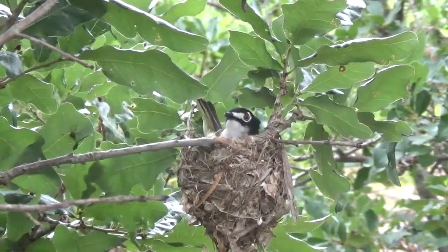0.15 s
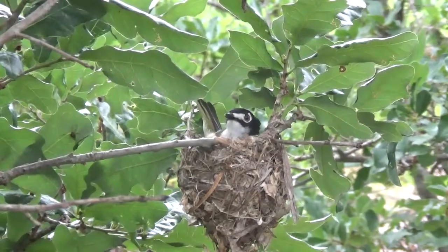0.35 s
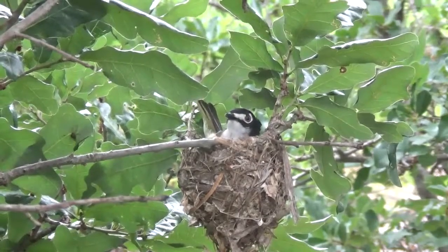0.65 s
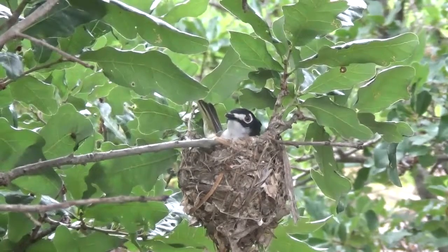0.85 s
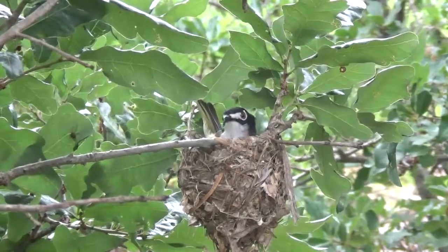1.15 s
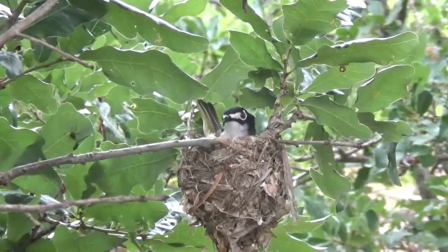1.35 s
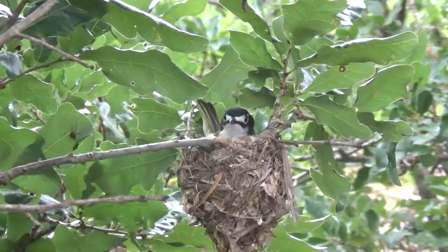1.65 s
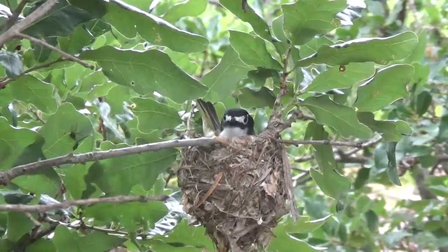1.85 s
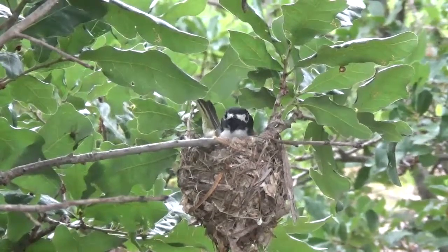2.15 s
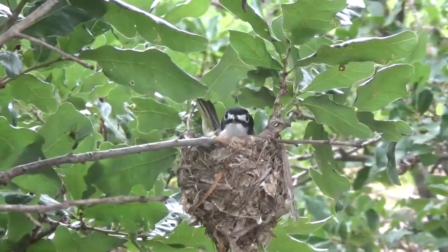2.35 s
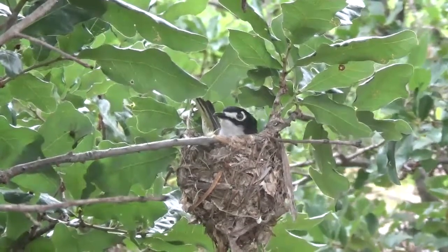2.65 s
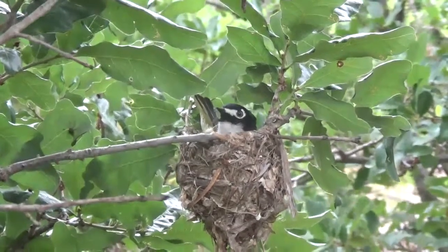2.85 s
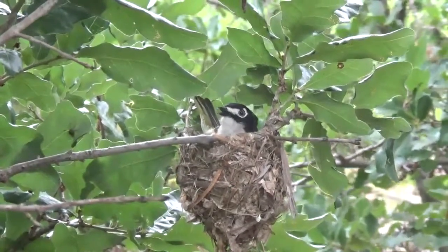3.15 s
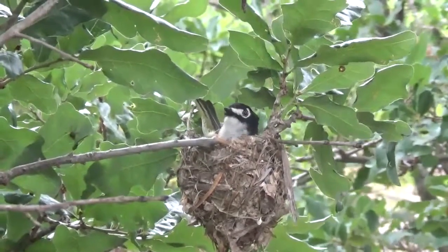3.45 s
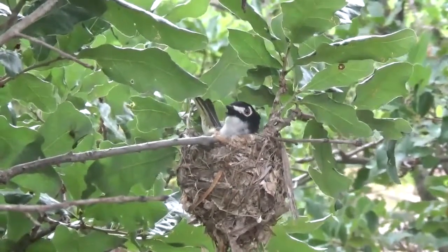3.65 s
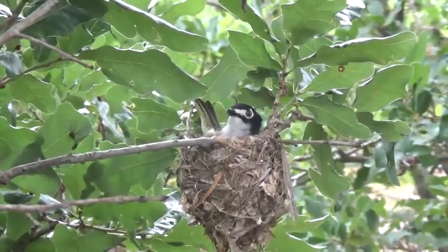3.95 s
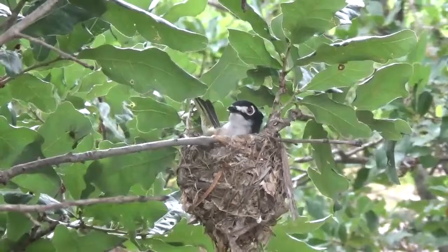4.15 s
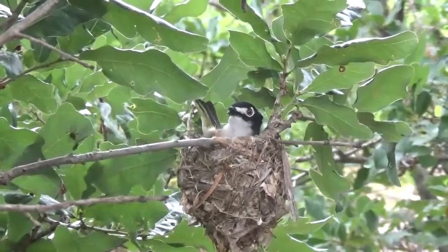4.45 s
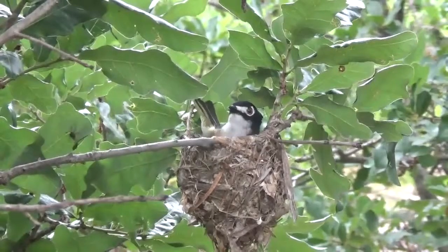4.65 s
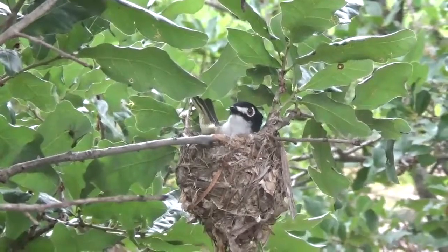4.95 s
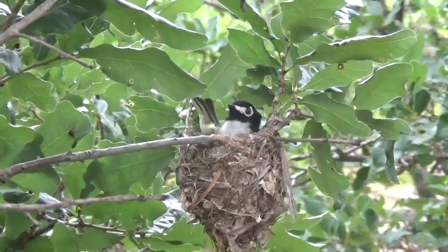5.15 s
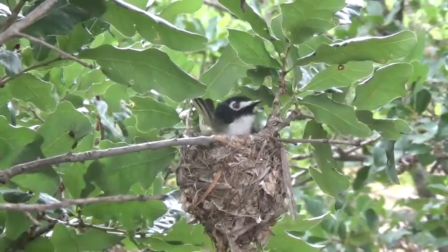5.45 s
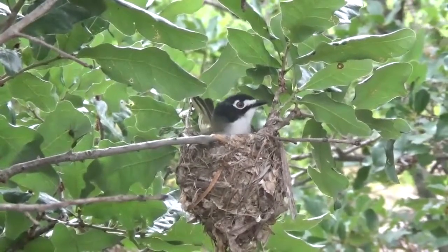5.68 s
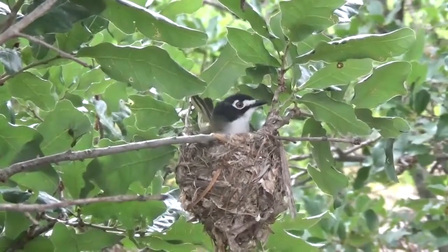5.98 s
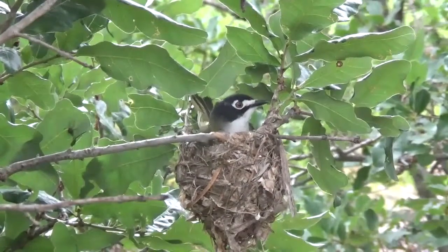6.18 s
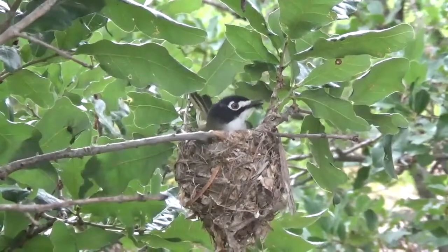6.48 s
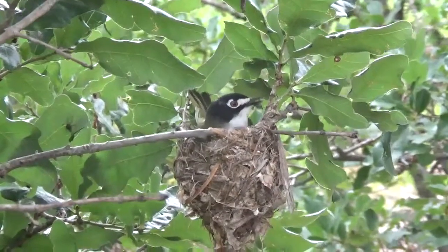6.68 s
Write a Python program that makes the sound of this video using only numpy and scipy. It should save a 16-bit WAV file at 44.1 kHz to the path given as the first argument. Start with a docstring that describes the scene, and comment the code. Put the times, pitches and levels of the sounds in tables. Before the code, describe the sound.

Quiet woodland air, then a close bird's jumbled song of tiny sharp chips, nasal mews, trills and buzzes, with another bird faintly whistling far off.

```python
"""Vireo singing in an oak wood

A near vireo strings together whistles, chatter, nasal notes and buzzes, each a quick gesture of the syrinx.
One side alone gives a harmonic tone; two sides together beat, which puts sidebands on every partial.
Branches and leaves scatter the song as echoes and noise tails; a second bird whistles glides far off.
Shaped noise makes the rumble and hiss of the wood and a low, distant drone."""
import sys
import numpy as np
from scipy import signal
from scipy.fft import rfft, irfft
from scipy.io import wavfile
from scipy.ndimage import uniform_filter1d

SR = 44100
rng = np.random.default_rng(int(sys.argv[2]) if len(sys.argv) > 2 else 0)


def master(y):
    """Save y as 16-bit WAV."""
    cut = np.clip(np.atleast_2d(y).T, -1, 1)
    pcm = np.round(cut * 32767)  # scale
    wavfile.write(sys.argv[1], SR, pcm.astype(np.int16))


N = 300762  # samples


def amp(db):
    """Decibels to gain."""
    return 10 ** (np.asarray(db) / 20)


def unit(x):
    """Scales to rms 1."""
    return x / np.sqrt(np.mean(x ** 2) + 1e-20)


def read(points, hz):
    """Reads a table on a log-frequency axis."""
    f, value = np.transpose(points)
    return np.interp(np.log(hz + 1), np.log(f + 1), value)


def add(mix, start_s, sound):
    """Mixes a sound in at its start time."""
    part = mix[max(round(start_s * SR), 0):][:len(sound)]
    part += sound[:len(part)]


def wander(size, rate_hz):
    """Random motion of rms about 1, fading out smoothly above the given rate."""
    hz = np.fft.rfftfreq(size + 4096, 1 / SR)
    spectrum = rfft(rng.standard_normal(2 * len(hz) - 2))
    return unit(irfft(spectrum * np.exp(-(hz / rate_hz) ** 2)))[:size]


def vireo():
    """The near bird's whole song: every kind of syrinx gesture, dry at the beak."""
    one_side = whistles() + chatter() + yelps() + slurs() + mew() + grace_notes() + rasp_trail()
    both_sides = squeak() + snarl() + chips() + twang() + buzzes() + sneeze()
    return one_side + both_sides


def whistles():
    """Clear tones from one side of the syrinx, the fundamental far above its overtones."""
    # throat colour: level_db of harmonics 1, 2, .. before the windpipe
    harmonics_db = [0, -27.5, -35.5, -31]
    # plain glides: start_s, length_s, first_hz, middle_hz, last_hz, level_db
    plain = [(2.024, 0.01, 3400, 3810, 4220, -27), (4.479, 0.041, 3130, 2690, 2460, -27.5),
             (4.507, .021, 5200, 4900, 5900, -36), (6.370, .044, 6550, 5760, 5100, -44),
             (6.395, 0.012, 10900, 10760, 10100, -29)]
    # a climb that cracks downward: time_s, pitch_hz, level_db
    whip = [(2.797, 3416, -45), (2.807, 5800, -36), (2.814, 7270, -46), (2.818, 6740, -26),
            (2.82, 4840, -13), (2.823, 3800, -35)]
    # the downstroke that tops the trill: time_s, pitch_hz, level_db
    flick = [(5.42, 6630, -45), (5.423, 5410, -18.5), (5.426, 4740, -6.5), (5.429, 4350, -14),
             (5.433, 4540, -18)]
    # a note with fast, even vibrato: time_s, centre_pitch_hz, level_db
    warble = [(4.524, 2490, -39), (4.530, 3400, -23), (4.537, 3525, -10), (4.544, 3440, -22.5),
              (4.551, 3120, -17), (4.558, 2765, -23.5), (4.570, 2390, -27.5), (4.586, 2050, -51)]
    notes = arches() + hooks() + trill() + dips() + glides(plain, swell_db=16.5)
    notes += [whip, flick, vibrato(warble, rate_hz=88, depth=0.12, crest_s=.0007)]
    return one_sided(notes, harmonics_db, jitter=.007, rush_db=-31.5, gain_db=0)


def arches():
    """Gestures whose pitch arches up and slides down."""
    # share of the note's length, pitch_hz, level_db; pitch and level before each note's changes
    shape = [(0, 2226, -39.5), (.14, 3090, -17), (.32, 3897, -22.5), (.43, 6280, -55), (.51, 4580, -27.5),
             (.57, 3415, -12), (.69, 2660, -17.5), (.82, 2290, -23.5), (1, 2095, -50)]
    # start_s, length_s, transposition_semitones, gain_db, crescendo_db
    notes = [(3.452, 0.064, 0.137, -2.5, 5.5), (3.534, 0.064, -0.064, 0, -3),
             (3.636, 0.057, 0.071, -1.5, 0)]
    return repeats(shape, notes)


def hooks():
    """High gestures ending in a loud downstroke."""
    # share of the note's length, pitch_hz, level_db; pitch and level before each note's changes
    shape = [(0, 5700, -25), (.22, 6550, -29.5), (.44, 7300, -26.5), (.63, 7060, -23.5), (.77, 5500, -7.5),
             (.91, 4660, -10.5), (1, 4400, -40)]
    # start_s, length_s, transposition_semitones, gain_db, crescendo_db
    notes = [(4.719, .032, -0.074, -1, 2.5), (4.776, .035, 0.1, 1, -2.5), (4.840, .0355, -0.1, -0.5, 0.5)]
    return repeats(shape, notes)


def trill():
    """One short gesture transposed upward step by step."""
    # share of the note's length, pitch_hz, level_db; pitch and level before each note's changes
    shape = [(0, 3200, -35), (.25, 3640, -19), (.55, 3605, -13), (.78, 3120, -15.5), (1, 2820, -34.5)]
    # start_s, length_s, transposition_semitones, gain_db, crescendo_db
    notes = [(5.331, .013, -4.5, -4.5, 0), (5.3487, 0.014, -3, -4, 9.5), (5.366, .014, -0.2, -1, 2),
             (5.3838, .0135, 3.5, 4.5, -5), (5.399, 0.016, 5, 5, -1)]
    return repeats(shape, notes)


def dips():
    """Gestures that plunge in pitch and turn up softly."""
    # share of the note's length, pitch_hz, level_db; pitch and level before each note's changes
    shape = [(0, 4000, -32), (.1, 3770, -19.5), (.22, 3160, -10.5), (.33, 2560, -20.5), (.42, 1930, -32),
             (.55, 1803, -43.5), (.72, 2220, -26.5), (.87, 2630, -33), (1, 2680, -43)]
    # start_s, length_s, transposition_semitones, gain_db, crescendo_db
    notes = [(5.464, .055, 0.1, 0, -1.5), (5.5412, .051, -0.1, 0, 0.5)]
    return repeats(shape, notes)


def chatter():
    """Sharp upstrokes from one side, with an unsteady pitch."""
    # throat colour: level_db of harmonics 1, 2 before the windpipe
    harmonics_db = [0.5, -27]
    # share of the note's length, pitch_hz, level_db; pitch and level before each note's changes
    shape = [(0, 3030, -45.5), (.16, 3670, -30.5), (.27, 4620, -12), (.38, 5200, -9), (.44, 6560, -36),
             (.57, 7530, -30.5), (.78, 6300, -33.5), (.95, 5150, -22)]
    # start_s, length_s, transposition_semitones, gain_db, crescendo_db
    notes = [(3.183, 0.035, -0.3, -4.5, 1.5), (3.2488, 0.034, 0.25, 0, 2), (3.319, .034, -0.24, .5, -1)]
    return one_sided(repeats(shape, notes), harmonics_db, jitter=0.023, rush_db=-23, gain_db=0)


def yelps():
    """One-sided notes whose throat favours the second harmonic; a short yelp closes each upstroke."""
    # throat colour: level_db of harmonics 1, 2, .. before the windpipe
    harmonics_db = [-14, 2, -16, -28, -35]
    # share of the note's length, pitch_hz, level_db; pitch and level before each note's changes
    shape = [(0, 1634, -36), (.33, 2106, -20), (.58, 2340, -15.5), (1, 2340, -39)]
    # start_s, length_s, transposition_semitones, gain_db, crescendo_db
    closers = [(3.213, .0135, -0.1, -0.5, 0), (3.280, 0.012, 0.25, 0.5, -1), (3.350, 0.0117, -0.4, -6, 2)]
    # the squawk that the whip breaks into: time_s, pitch_hz, level_db before the layer gain
    squawk = [(2.82, 4240, -31), (2.823, 3500, -26.5), (2.826, 2830, -16.5), (2.83, 2360, -17.5),
              (2.834, 2008, -34), (2.838, 2280, -18.5), (2.842, 2760, -16.5), (2.847, 2786, -30),
              (2.854, 2720, -30)]
    # a note with fast, even vibrato: time_s, centre_pitch_hz, level_db before the layer gain
    quaver = [(4.257, 3010, -28), (4.267, 2990, -23.5), (4.275, 2833, -19.5), (4.284, 2753, -27),
              (4.289, 2720, -36)]
    notes = repeats(shape, closers) + [squawk, vibrato(quaver, rate_hz=122, depth=.1, crest_s=.006)]
    return one_sided(notes, harmonics_db, jitter=.008, rush_db=-26.5, gain_db=-0.5)


def slurs():
    """Nasal falling notes from one side; the second harmonic leads."""
    # throat colour: level_db of harmonics 1, 2, .. before the windpipe
    harmonics_db = [-6, 0, -22, -35, -29, -28]
    # share of the note's length, pitch_hz, level_db; pitch and level before each note's changes
    shape = [(0, 1680, -46), (.08, 1720, -27), (.31, 1652, -27.5), (.58, 1493, -29.5), (.8, 1295, -33.5),
             (1, 1034, -43)]
    # start_s, length_s, transposition_semitones, gain_db, crescendo_db
    notes = [(6.678, .047, 0.11, -0.5, 4), (6.751, 0.052, -0.12, 0.5, -1.5)]
    return one_sided(repeats(shape, notes), harmonics_db, jitter=0.0037, rush_db=-32, gain_db=-1)


def mew():
    """A nasal, falling note from one side; the third harmonic leads."""
    # throat colour: level_db of harmonics 1, 2, .. before the windpipe
    harmonics_db = [-15, -10.5, 0, -14, -23, -27, -28]
    # time_s, pitch_hz, level_db before the layer gain
    note = [(3.033, 1896, -37), (3.04, 1760, -40), (3.047, 1670, -25), (3.058, 1520, -25),
            (3.07, 1430, -23.5), (3.078, 1416, -28), (3.082, 1194, -31), (3.09, 967, -33)]
    return one_sided([note], harmonics_db, jitter=.004, rush_db=-36, gain_db=-0.5)


def grace_notes():
    """Soft one-sided glides with an unsteady pitch and audible breath."""
    # throat colour: level_db of harmonics 1, 2, .. before the windpipe
    harmonics_db = [-2, 1.5, -11.5, -27]
    # start_s, length_s, first_hz, middle_hz, last_hz, level_db before the layer gain
    notes = [(2.030, .012, 2580, 2970, 3120, -34.5), (4.474, 0.02, 1520, 1828, 1830, -32.5),
             (5.319, 0.014, 1500, 1780, 2530, -30.5)]
    return one_sided(glides(notes, swell_db=12), harmonics_db, jitter=0.023, rush_db=-21, gain_db=-3)


def rasp_trail():
    """A hoarse trail over and after the mew: strong pitch jitter breaks up its tone."""
    # start_s, length_s, first_hz, middle_hz, last_hz, level_db before the layer gain
    notes = [(3.075, .068, 3350, 3150, 3400, -41.5)]
    return one_sided(glides(notes, swell_db=5.5), [0, -17], jitter=0.21, rush_db=-26.5, gain_db=2.5)


def squeak():
    """A brief two-sided note with a rough beat; the second side joins at once."""
    # throat colour: level_db of harmonics 1, 2, .. before the windpipe; first side, second side
    harmonics_db = ([-23.5, 0.5, -17], [-53, -60, -29, -30, -46])
    # time_s, pitch_hz, level_db before the layer gain, second_side_hz
    note = [(0.0, 3020, -14, 1990), (0.012, 2960, -16.5, 1990), (0.022, 2928, -20.5, 1994),
            (0.033, 2880, -13.5, 1996), (0.038, 2915, -41, 1980), (0.046, 2630, -22, 1920)]
    return two_sided([note], harmonics_db, jitter=0.0064, coupling=0.17, rasp=0.28, lag_s=0.0018,
                     closed_db=-2, rush_db=-26.0, gain_db=-2)


def snarl():
    """A long, breathy two-sided note, its top damped while the beak is narrow."""
    # throat colour: level_db of harmonics 1, 2, .. before the windpipe; first side, second side
    harmonics_db = ([-13.5, -15, -2.5, -1.5, 2.5, 4.5], [-17.5, -10, 3.5, -24])
    # time_s, pitch_hz, level_db before the layer gain, second_side_hz
    note = [(1.735, 1585, -42, 2463), (1.745, 1554, -32, 2610), (1.762, 1683, -29.5, 2843),
            (1.777, 1622, -29, 2742), (1.795, 1520, -31, 2513), (1.815, 1447, -31.5, 2372),
            (1.833, 1416, -31.5, 2150.0), (1.847, 1340.0, -38, 2080)]
    return two_sided([note], harmonics_db, jitter=0.0091, coupling=0.12, rasp=0.13, lag_s=0.0099,
                     closed_db=-36, rush_db=-7, gain_db=-1.0)


def chips():
    """Rising notes with a strong beat between the two sides."""
    # throat colour: level_db of harmonics 1, 2, .. before the windpipe; first side, second side
    harmonics_db = ([-14.5, 1, -19, -34], [-27, -9.5, -38])
    # share of the note's length, pitch_hz, level_db, second_side_hz; before each note's changes
    shape = [(0, 1483, -38, 2240), (.17, 2020, -28.5, 2547), (.3, 2341, -16, 2950), (.42, 2748, -17, 3365),
             (.6, 3140, -25, 3710), (.77, 3130, -20.5, 3730), (1, 2900, -35, 3682)]
    # start_s, length_s, transposition_semitones, gain_db, crescendo_db
    notes = [(2.071, .035, -0.1, -1, 1.5), (2.128, 0.04, 0.11, 1, 4.5), (2.192, .041, -0.094, -1, -2)]
    return two_sided(repeats(shape, notes), harmonics_db, jitter=.012, coupling=0.26, rasp=0.092,
                     lag_s=.002, closed_db=-4, rush_db=-19.5, gain_db=0.5)


def twang():
    """A breathy two-sided note whose two pitches rise and fall together."""
    # throat colour: level_db of harmonics 1, 2, .. before the windpipe; first side, second side
    harmonics_db = ([-8, 0, 6, -1.5], [-15, 0, -18])
    # time_s, pitch_hz, level_db before the layer gain, second_side_hz
    note = [(4.195, 1754, -47, 2666), (4.203, 2164, -33, 2917), (4.211, 2364, -27.5, 3170),
            (4.219, 2400, -29, 3120), (4.228, 2225, -28, 2920), (4.238, 1800, -47, 2610)]
    return two_sided([note], harmonics_db, jitter=0.0077, coupling=0.19, rasp=.08, lag_s=0.0045,
                     closed_db=-8.5, rush_db=-7, gain_db=-0.5)


def buzzes():
    """Long two-sided notes with the strongest beat, heard as a buzz."""
    # throat colour: level_db of harmonics 1, 2, .. before the windpipe; first side, second side
    harmonics_db = ([-20, 1, -13, -30.5], [-29, -24, -7, -10.5, -19.5, -33])
    # share of the note's length, pitch_hz, level_db, second_side_hz; before each note's changes
    shape = [(0, 2400, -32.5, 1776), (.08, 2530, -14.5, 1797), (.25, 2639, -19, 1765),
             (.33, 2614, -13.5, 1661), (.43, 2720, -14, 1594), (.56, 2810, -17.5, 1690),
             (.8, 2820, -20.5, 1770), (1, 2790, -34.5, 1800)]
    # start_s, length_s, transposition_semitones, gain_db, crescendo_db
    notes = [(5.092, .064, 0.1, -0.5, 7), (5.174, .068, -0.13, 0, -3.5)]
    return two_sided(repeats(shape, notes), harmonics_db, jitter=.006, coupling=0.28, rasp=.1,
                     lag_s=0.015, closed_db=-5, rush_db=-21.5, gain_db=0)


def sneeze():
    """A breathy, raspy two-sided note with the two pitches close together."""
    # throat colour: level_db of harmonics 1, 2, .. before the windpipe; first side, second side
    harmonics_db = ([-7.5, 0, 7.5, 2, -1], [-22, -1.5, 6, 2])
    # time_s, pitch_hz, level_db before the layer gain, second_side_hz
    note = [(6.336, 2185, -45, 2115), (6.343, 2108, -35.5, 2095), (6.35, 2160, -33, 2270),
            (6.355, 2690, -28.5, 2693), (6.36, 3030, -28.5, 3180), (6.367, 2980, -36, 3280),
            (6.378, 3130.0, -55, 3200.0)]
    return two_sided([note], harmonics_db, jitter=0.012, coupling=0.14, rasp=0.25, lag_s=0.01,
                     closed_db=-3, rush_db=-5, gain_db=-2)


def repeats(shape, notes):
    """Sings one learnt shape repeatedly, each time stretched, transposed and leaning on its start or end."""
    share, hz, db, *second_hz = np.transpose(shape)
    sung = []
    for start, length, semitones, gain_db, crescendo_db in notes:
        ratio = 2 ** (semitones / 12)
        level = db + gain_db + crescendo_db * (share - .5)
        second_side = [side * ratio for side in second_hz]
        sung.append(np.column_stack([start + length * share, hz * ratio, level, *second_side]))
    return sung


def glides(notes, swell_db):
    """The pitch bends smoothly from first to last; the level swells towards the middle and dies away."""
    u = np.linspace(-1, 1, 21)  # start to end of the note
    sung = []
    for start, length, first, middle, last, db in notes:
        time = start + length * (u + 1) / 2
        pitch = middle + (last - first) / 2 * u + ((first + last) / 2 - middle) * u ** 2
        sung.append(np.column_stack([time, pitch, db - swell_db * u ** 2]))
    return sung


def vibrato(note, rate_hz, depth, crest_s):
    """Swings the pitch about its centre; the first crest comes crest_s after the note starts."""
    s, hz, db = np.transpose(note)
    t = np.arange(s.min(), s.max(), 1 / SR)
    swing = 1 + depth * np.cos(2 * np.pi * rate_hz * (t - t[0] - crest_s))
    return np.column_stack([t, np.interp(t, s, hz) * swing, np.interp(t, s, db)])


def one_sided(notes, harmonics_db, jitter, rush_db, gain_db):
    """One vibrating side of the syrinx gives a harmonic tone, with breath around it."""
    out = np.zeros(N)
    for rows in notes:
        start, (hz, db) = gesture(rows)
        _, tone = membrane(hz, harmonics_db, jitter)
        sound = amp(db) * tone.imag + breathy(hz, db, rush_db)
        add(out, start, amp(gain_db) * fade(len(hz)) * sound)
    return out


def two_sided(notes, harmonics_db, jitter, coupling, rasp, lag_s, closed_db, rush_db, gain_db):
    """Both sides share one air stream, so their beat puts sidebands on every partial."""
    out = np.zeros(N)
    for rows in notes:
        start, (hz, db, second_hz) = gesture(rows)
        size = len(hz)
        phase, tone = membrane(hz, harmonics_db[0], jitter)
        second_phase, second_tone = membrane(second_hz, harmonics_db[1], jitter)
        joined = np.minimum(np.arange(size) / SR / lag_s, 1) ** 2  # entry of the second side
        beat = coupling * np.cos(phase - second_phase) + rasp * wander(size, rate_hz=1400)
        flow = np.exp(joined * beat * (.6 + 1j))  # the beat swells the tone and pulls its phase
        flow = flow / np.sqrt(np.mean(np.abs(flow) ** 2))
        voice = (flow * (tone + joined * second_tone)).imag
        sound = voice + joined * amp(rush_db) * rush(size)
        add(out, start, amp(db + gain_db) * fade(size) * beak(sound, closed_db))
    return out


def gesture(rows):
    """Start time and per-sample controls of a note; muscle inertia rounds the corners."""
    s, *columns = np.transpose(rows)
    t = np.arange(s.min(), s.max(), 1 / SR)
    controls = [uniform_filter1d(np.interp(t, s, c), size=80, mode="nearest") for c in columns]
    return s.min(), controls


def fade(size):
    """The membranes start and stop within about a millisecond."""
    edge_s = np.minimum(np.arange(size), np.arange(size)[::-1]) / SR
    return np.sin(np.pi / 2 * np.minimum(edge_s / .0012, 1)) ** 2


def membrane(hz, harmonics_db, jitter):
    """One side of the syrinx through the windpipe: its phase and complex tone, with an unsteady pitch."""
    # colour of windpipe and beak: frequency_hz, level_db before it is set against the leading harmonic
    windpipe = [(1000, -26), (1300, -10), (1650, -5), (2100, -5.5), (3100, 2.5), (5000, 4), (6200, -1),
                (7600, -2.5), (9700, 0.5), (11000, -2)]
    unsteady_hz = hz * (1 + jitter * wander(len(hz), rate_hz=580))
    phase = 2 * np.pi * np.cumsum(unsteady_hz) / SR
    k = np.arange(1, len(harmonics_db) + 1)[:, None]
    pipe_db = read(windpipe, k * hz)
    leader = np.argmin(np.abs(harmonics_db))  # the harmonic nearest 0 dB
    pipe_db = pipe_db - pipe_db[leader]
    level = amp(np.array(harmonics_db)[:, None] + pipe_db)
    partials = level * np.exp(1j * k * phase) * (k * hz < SR / 2)
    return phase, partials.sum(0)


def breathy(hz, db, rush_db):
    """Air keeps rushing through the brief dips of the tone."""
    return amp(rush_db) * uniform_filter1d(amp(db), size=700, mode="nearest") * rush(len(hz))


def rush(size):
    """Turbulent air through the open beak: coloured noise."""
    # colour of the rushing air before it is scaled to rms 1: frequency_hz, level_db
    air_colour = [(1000, -45), (1900, -20.5), (2800, -12.5), (4500, 1), (6500, 2.5), (7800, 1), (9700, 3),
                  (12000, -9.5), (16000, -24)]
    hz = np.fft.rfftfreq(2 * size, 1 / SR)
    return unit(irfft(rfft(rng.standard_normal(2 * size)) * amp(read(air_colour, hz))))[:size]


def beak(sound, closed_db):
    """The beak opens and shuts over a note; the top of the voice comes out best when it is wide."""
    low = signal.sosfiltfilt(signal.butter(4, 7000, fs=SR, output="sos"), sound)
    gape = np.sin(np.linspace(0, np.pi, len(sound)))
    return low + (sound - low) * amp(closed_db * (1 - gape) ** 2)


def ports(x):
    """The two microphone ports hear the bird with slightly different colour."""
    # port colour: frequency_hz, left_minus_right_db
    balance = [(2000, 0.5), (3200, -1.7), (4500, 0.5), (6000, 0.9), (10000, 0.5)]
    side_db = read(balance, np.fft.rfftfreq(N, 1 / SR)) / 2
    return irfft(rfft(x) * amp([side_db, -side_db]), N)


def branches(x):
    """Nearby branches and ground throw back a few distinct early echoes."""
    # reflections: delay_s, level_db
    echoes = [(.0027, -28), (.0042, -22.5), (.0063, -18), (.0084, -26.5), (0.0116, -28), (0.02, -27),
              (0.031, -29.5)]
    out = np.zeros(N)
    for delay_s, db in echoes:
        add(out, delay_s, amp(db) * x)
    return out


def foliage(x, t60_factor, spread):
    """Many faint reflections from leaves, dying band by band; spread is their left-right difference."""
    # decay of the leaf tail before t60_factor: frequency_hz, t60_s
    leaf_t60 = [(1500, 0.11), (3000, 0.2), (6000, 0.26), (11000, 0.33)]
    size = SR // 2
    sparse = rng.random(size) < .2
    taps = rng.standard_normal((2, size)) * sparse * (np.arange(size) > .003 * SR)
    hz, t, z = signal.stft(taps, SR, nperseg=128)
    decay_db = -60 * t / (t60_factor * read(leaf_t60, hz)[:, None])
    mid, side = signal.istft(z * amp(decay_db), SR, nperseg=128)[1]
    tail = np.array([mid + spread * side, mid - spread * side]) / np.linalg.norm(mid)
    return signal.fftconvolve(x[None], tail, axes=1)[:, :N]


def far_bird():
    """A second bird far off: plain one-sided glides of a single harmonic."""
    # start_s, length_s, first_hz, middle_hz, last_hz, level_db before the layer gain
    notes = [(2.34, .14, 4750, 3800, 2750, -58.5), (2.59, .13, 2580, 2320, 1910, -68),
             (2.89, .11, 4630, 3790, 3100, -62), (3.405, .04, 2880, 3190, 3280, -57.5)]
    return one_sided(glides(notes, swell_db=7), [0], jitter=.006, rush_db=-40.5, gain_db=-3)


def woodland_air(level_db=-56.0, patchy_db=0.85):
    """Distant rumble and leaf hiss: partly shared stereo noise, drifting a little in patches."""
    # colour of the air before it is scaled to rms 1: frequency_hz, level_db
    air = [(15, -34), (28, -11), (50, -3), (85, -4.5), (125, -4), (165, -9), (350, -10), (620, -11),
           (900, -11), (1200, -15.5), (1850, -18), (4500, -20), (6400, -22.5), (9000, -20.5),
           (11000, -27.5), (14000, -59.5)]
    # frequency_hz, left_right_likeness (1 is identical)
    likeness = [(60, 0.99), (130, 0.97), (260, 0.65), (560, 0.61), (1170, 0.37), (2450, 0.41), (5140, 0.68),
                (10800, 0.5)]
    hz = np.fft.rfftfreq(2048, 1 / SR)
    a, b, c, d, patches = rng.standard_normal((N // 512 + 5, len(hz), 5)).T
    patches = uniform_filter1d(patches, size=16, axis=0)  # across frequency
    patches = unit(uniform_filter1d(patches, size=12, axis=1))  # across time
    same = np.clip(read(likeness, hz), -1, 1)[:, None]
    left = a + 1j * b
    right = same * left + np.sqrt(1 - same ** 2) * (c + 1j * d)
    z = np.array([left, right]) * amp(read(air, hz)[:, None] + patchy_db * patches)
    noise = unit(signal.istft(z, nperseg=2048, noverlap=1536)[1][:, :N])
    return noise * amp(level_db)


def drone(centre_hz=92, width_hz=14, level_db=-65):
    """A low, far-off drone of narrow-band noise, alike at both ports."""
    hz = np.fft.rfftfreq(N, 1 / SR)
    band = np.exp(-((hz - centre_hz) / width_hz) ** 2)
    return amp(level_db) * unit(irfft(rfft(rng.standard_normal(N)) * band, N))


def scene():
    """The near bird with its echoes, the far bird, and the air of the wood."""
    song = vireo()
    far = far_bird()
    direct = ports(song + branches(song))
    near_leaves = amp(-7.5) * foliage(song, t60_factor=0.27, spread=0.46)
    far_leaves = amp(-23.5) * foliage(song, t60_factor=1.1, spread=.5)
    far_tail = amp(-8) * foliage(far, t60_factor=1.3, spread=0.66)
    return direct + near_leaves + far_leaves + far + far_tail + woodland_air() + drone()


def record(dry):
    """The recorder's band limit: a steep low-pass."""
    edge_hz = 11150
    lowpass = signal.firwin(401, edge_hz, window=("kaiser", 8), fs=SR)
    return signal.oaconvolve(dry, lowpass[None], "same")


dry = scene()
out = record(dry)
master(out)
```